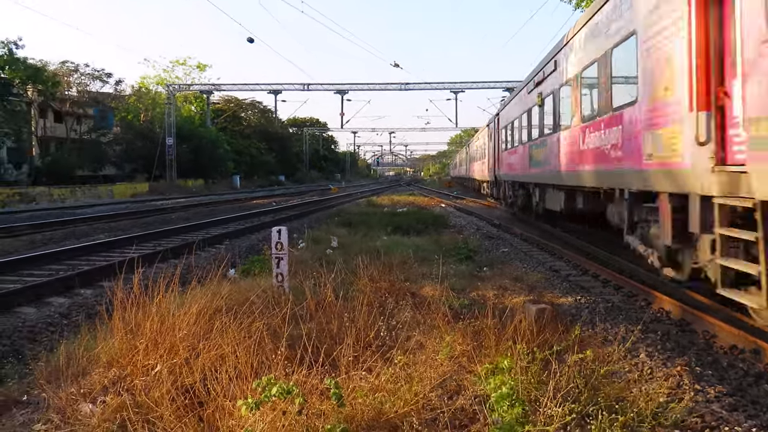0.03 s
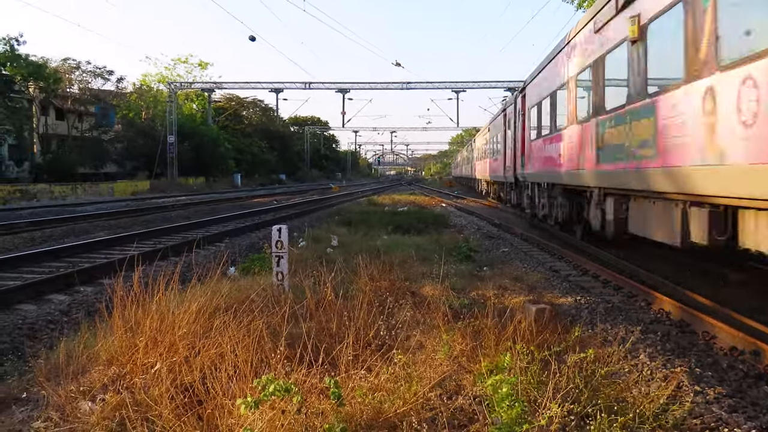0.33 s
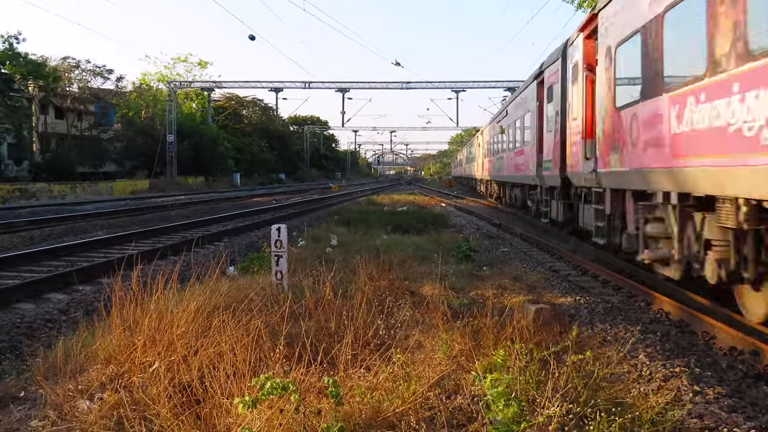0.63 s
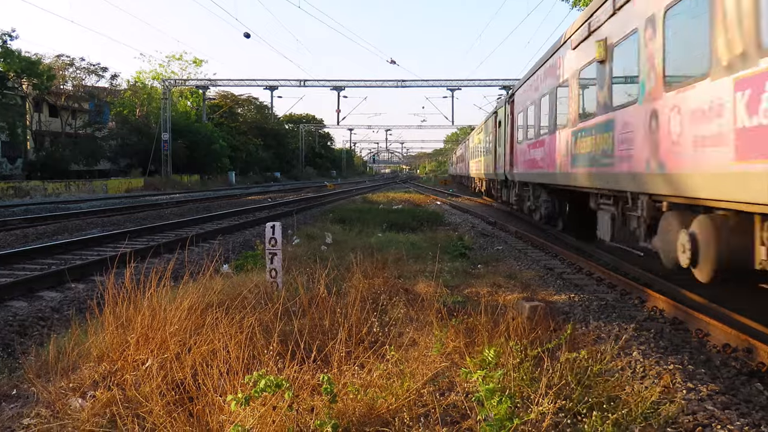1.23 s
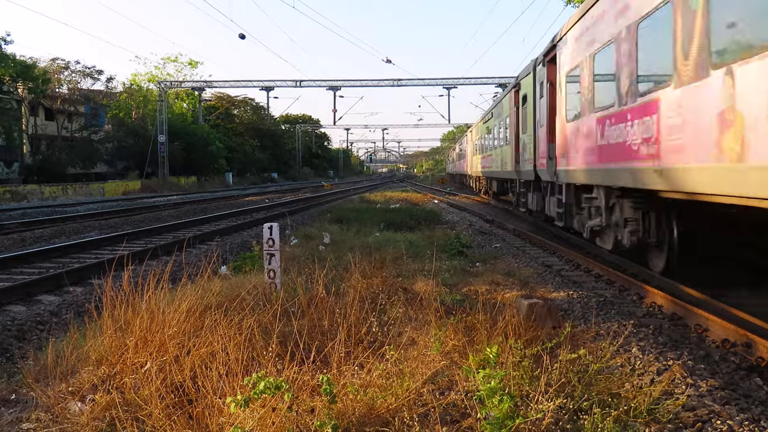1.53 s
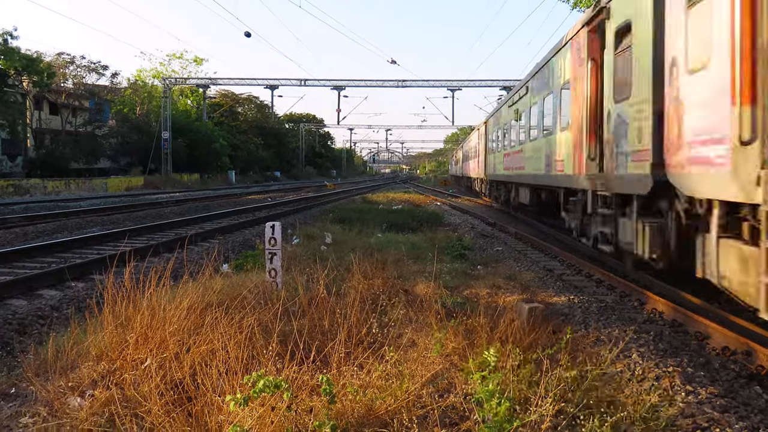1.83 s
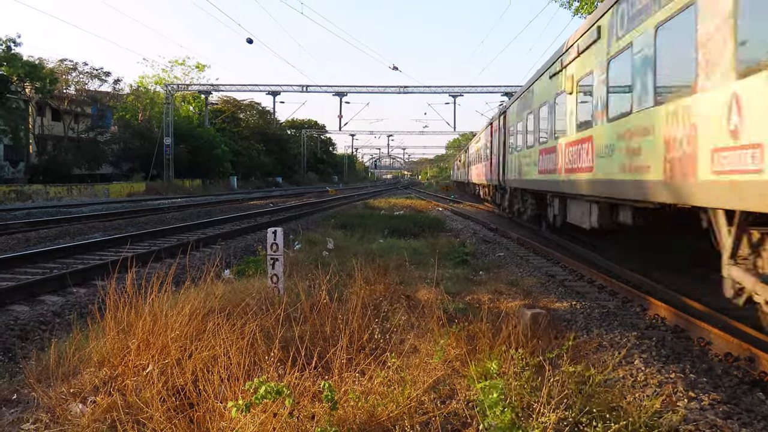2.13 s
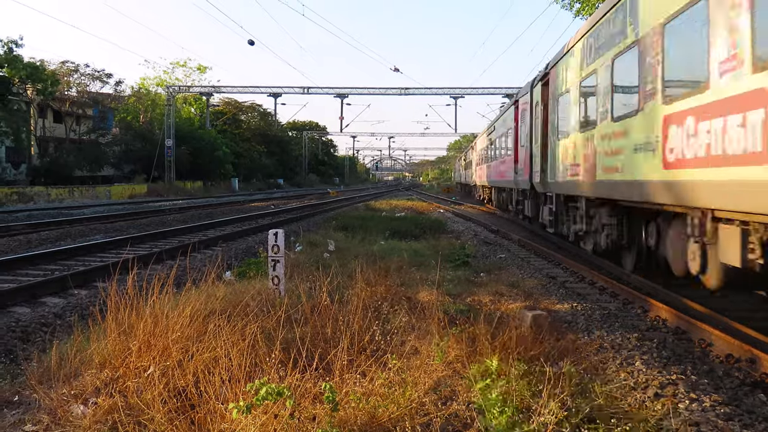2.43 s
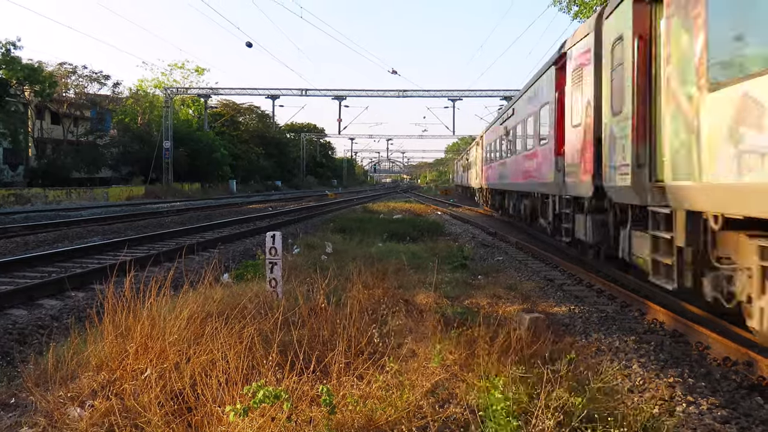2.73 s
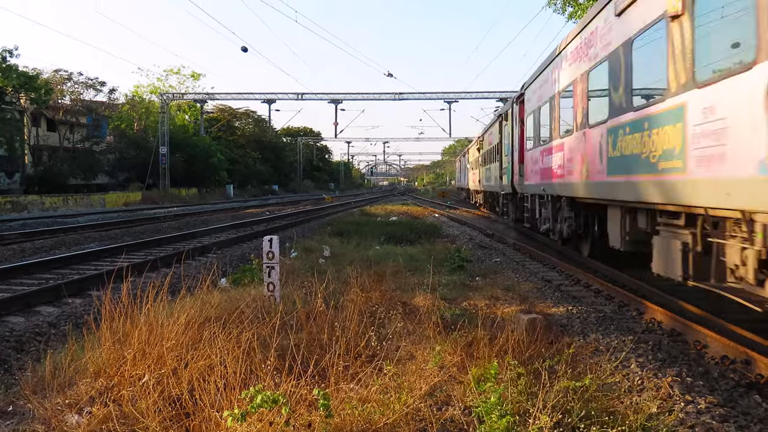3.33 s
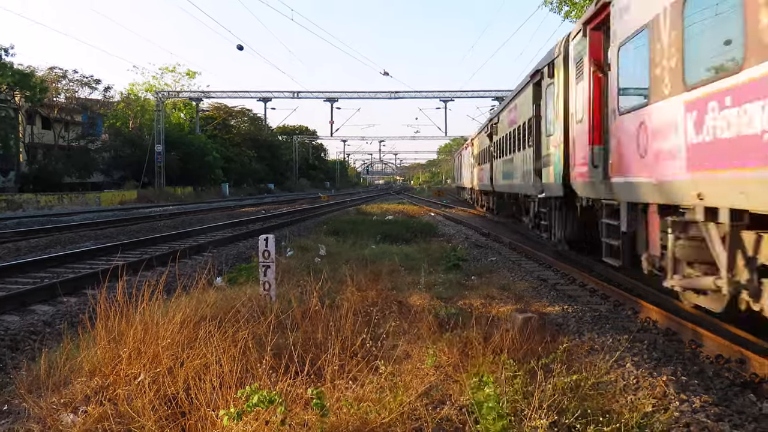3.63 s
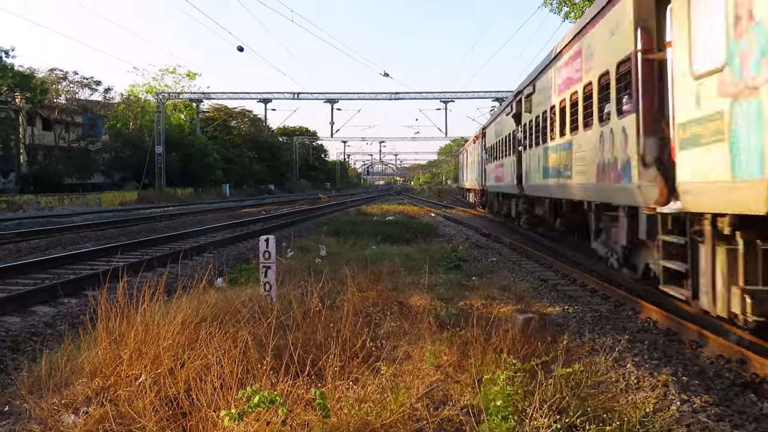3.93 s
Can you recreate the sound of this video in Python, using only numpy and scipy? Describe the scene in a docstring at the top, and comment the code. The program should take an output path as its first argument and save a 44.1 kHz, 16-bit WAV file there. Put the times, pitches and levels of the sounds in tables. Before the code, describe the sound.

A passenger train rolls past a few metres away on open ground, rumbling and roaring throughout. Light metal knocks crowd the first second. From 0.2 seconds, wheels clack in pairs over a rail joint about every half second, with distant knocks between. Near 1 second and from 2.9 seconds on, the steel wheels hiss and sing loudest, falling in pitch as their draught buffets the microphone.

```python
"""A passenger train rolls past a few metres from a stereo microphone on open ground.
Rumble and rolling roar run throughout; light knocks of the running gear crowd the first second.
From 0.2 s each bogie clacks twice over a rail joint, with distant wheels knocking in between.
Near 1 s, and again from 2.9 s on, steel wheels hiss and sing loudest, falling in pitch as they
go by, and their draught buffets the microphone."""
import sys
import numpy as np
from scipy import signal
from scipy.fft import rfft, irfft
from scipy.io import wavfile
from scipy.ndimage import map_coordinates

SR = 44100
rng = np.random.default_rng(int(sys.argv[2]) if len(sys.argv) > 2 else 0)


def waveform_to_disk(signal):
    """Save audio, clipped to [-1, 1], as 16-bit WAV at the path in sys.argv[1]."""
    frames = np.transpose(np.atleast_2d(signal))
    scaled = np.clip(frames, -1, 1) * 32767
    samples = np.round(scaled).astype(np.int16)
    wavfile.write(sys.argv[1], SR, samples)


N = 176400
T = np.arange(N) / SR
HZ = np.fft.rfftfreq(N, 1 / SR)
SLEEPER_HZ = 391  # usual knock pitch

# Hollow track boom, metal clank, bright steel crash. Each row: frequency in Hz, relative level in dB.
BOOM_SPECTRUM = [(200, -38.5), (330, 2.5), (395, 2.5), (480, -9)]
CLANK_SPECTRUM = [(200, -27.5), (550, 7), (800, 1), (1150, 0), (1400, -9.5), (2000, -4), (2500, -7),
                  (4000, -37)]
CRASH_SPECTRUM = [(600, 4.5), (2700, 3), (5300, 3.5), (6500, -9), (8000, -3.5), (12000, -26.5),
                  (15500, -29)]


def amp(db):
    """Decibels to gain."""
    return 10 ** (np.asarray(db) / 20)


def unit(x):
    """Scale to rms 1."""
    return x / np.sqrt(np.mean(x ** 2) + 1e-20)


def spectrum(points):
    """Gain per frequency from (Hz, dB) points, falling steeply above the last."""
    hz, db = np.transpose(points)
    return amp(np.interp(np.log(HZ + 1), np.log(hz + 1), db)) / np.maximum(HZ / hz[-1], 1) ** 4


def level(points):
    """Gain per sample from (s, dB) points."""
    return amp(np.interp(T, *np.transpose(points)))


def wander(rate_hz):
    """Low-passed random drift, rms 1."""
    return unit(irfft(rfft(rng.standard_normal(N)) / (1 + (HZ / rate_hz) ** 4), N))


def noise(points, ring_db=0, spacing_hz=60):
    """Coloured mid and side noise, rms 1; ring_db sets the depth of close random resonances."""
    smoothing = np.exp(-(np.arange(len(HZ)) * spacing_hz / SR) ** 2)
    ripple = unit(irfft(rfft(rng.standard_normal(N)) * smoothing, N))[:len(HZ)]
    resonances = amp(ring_db * np.clip(ripple, -2, 2))
    return unit(irfft(rfft(rng.standard_normal((2, N))) * spectrum(points) * resonances, N))


def blows(times_s, levels_db, fade_s, tail_db=-np.inf, tail_s=1, rise_s=0.0037):
    """Envelope of blows summed in power: quick rise, fast fade, optional tail."""
    power = np.zeros(N)
    for at_s, db in zip(times_s, levels_db):
        start = max(int((at_s - rise_s / 2) * SR), 0)
        t = T[:N - start][:SR]
        shape = np.minimum(t / rise_s, 1) * (np.exp(-t / fade_s) + amp(tail_db) * np.exp(-t / tail_s))
        power[start:start + len(t)] += (amp(db) * shape) ** 2
    return np.sqrt(power)


def sleeper(times_s, levels_db, pitches_hz):
    """Each blow rings the hollow modes of sleeper and rail, slightly detuned every time."""
    # Each row: multiple of the knock pitch, relative level in dB, t60 in seconds.
    modes = [(0.762, -8, 0.085), (1, 1, 0.071), (1.25, -7.5, 0.091), (1.95, -9.5, 0.065)]
    out, t = np.zeros(N + SR), T[:SR // 4]
    pitches_hz = pitches_hz * np.ones(len(times_s))
    detunes = 1 + 0.021 * rng.standard_normal((len(times_s), len(modes)))
    for at_s, db, hz, detune in zip(times_s, levels_db, pitches_hz, detunes):
        start = max(int(at_s * SR), 0)
        for k, (ratio, mode_db, t60_s) in enumerate(modes):
            tone = (-1) ** k * np.sin(2 * np.pi * hz * ratio * detune[k] * t)
            out[start:start + len(t)] += tone * amp(db + mode_db - 60 * t / t60_s)
    return np.array([out[:N], np.roll(out[:N], SR // 200)])  # side lags mid by 5 ms


def doppler(source, nearest_s, speed_m_per_s=24, distance_m=4.3):
    """Changing travel time bends the pitch of a passing source."""
    emitted_s = T - np.hypot(distance_m, speed_m_per_s * (T - nearest_s)) / 343
    near = abs(T - nearest_s) < .5
    positions = emitted_s[near] * SR % (N - 1)
    out = np.zeros((2, N))
    for channel in range(2):
        out[channel, near] = map_coordinates(source[channel], [positions], order=3, mode="wrap")
    return out


def rolling():
    """Rumble of the coaches, roar of rough wheels, throbbing boom of the track."""
    # Each row: frequency in Hz, relative level in dB.
    rumble_spectrum = [(15, -41), (48, -5.5), (105, -3.5), (200, -10.5), (1000, -50.5)]
    roar_spectrum = [(70, -32), (145, -11.5), (220, -8.5), (390, -3), (600, -11.5), (850, -12), (1350, -20),
                     (1800, -17.5), (2200, -25), (5000, -24), (6500, -38.5), (9500, -40.5), (16000, -54.5)]
    # Each row: time in seconds, relative level in dB.
    rumble_levels = [(0, -27), (.6, -32), (1.2, -38), (1.75, -39), (2.5, -35), (2.7, -36.5), (3.4, -31.5),
                     (4, -31.5)]
    roar_levels = [(0, -19), (.68, -20.5), (.79, -24), (.9, -22), (1.12, -23), (1.4, -26.5), (1.75, -27.5),
                   (2.0, -25.5), (2.15, -27), (4, -25.5)]
    rumble = noise(rumble_spectrum) * level(rumble_levels) * amp(wander(38))
    roar = noise(roar_spectrum, ring_db=1.5, spacing_hz=70)
    roar *= amp(-3.5 + 0.73 * wander(21) + 0.8 * wander(190))
    boom = noise(BOOM_SPECTRUM) * amp(-9 + 4.9 * wander(5.7))
    return rumble + (roar + boom) * level(roar_levels)


def far_knocks():
    """Of distant wheels only the hollow note of the track carries."""
    # Each row: start in seconds, relative level in dB.
    hits = [(0.115, -18), (0.703, -16.5), (1.117, -21.5), (1.534, -27), (1.65, -27.5), (2.481, -22.5),
            (2.615, -23.5), (3.464, -23.5)]
    at_s, db = np.transpose(hits)
    return sleeper(at_s, db + 7, SLEEPER_HZ) + noise(BOOM_SPECTRUM) * blows(at_s, db - 10, fade_s=0.03)


def draughts(width_s=0.034):
    """Gusts from the bogies push the two microphone ports in opposite phase."""
    # Each row: peak time in seconds, level in dB.
    gusts = [(0.97, -30), (2.92, -35), (3.27, -26.5), (3.88, -25.5)]
    # Each row: frequency in Hz, relative level in dB.
    gust_spectrum = [(30, -22.5), (120, -3.5), (420, 0), (1200, -15)]
    swell = sum(amp(db) / (1 + ((T - peak_s) / width_s) ** 2) ** 0.85 for peak_s, db in gusts)
    return noise(gust_spectrum)[0] * swell * np.array([[1], [-1]])


def gear_knocks():
    """Single short blows of the running gear, each with a dull thud of the underframe."""
    # Each row: start in seconds, then relative clank, knock and crash levels in dB.
    hits = [(0.046, -24, -19, -23), (0.074, -9.5, -14.5, -22), (0.373, -20, -17, -18.5),
            (0.482, -15, -11.5, -20), (0.544, -9.5, -16.5, -28), (0.597, -11, -18, -16.5),
            (0.837, -8.5, -16.5, -18), (1.045, -4.5, -21, -32), (1.073, -9.5, -13.5, -50),
            (1.17, -13, -16.5, -34), (2.058, -14, -22, -31.5)]
    # Each row: frequency in Hz, relative level in dB.
    thud_spectrum = [(80, -15), (150, 0.5), (320, 12.5), (600, -21.5)]
    at_s, clank_db, knock_db, crash_db = np.transpose(hits)
    thud = noise(thud_spectrum) * blows(at_s, knock_db - 9.5, fade_s=0.032)
    clank = noise(CLANK_SPECTRUM) * blows(at_s, clank_db - 14, fade_s=0.032, tail_db=-16.5, tail_s=0.037)
    crash = noise(CRASH_SPECTRUM, ring_db=-2.5, spacing_hz=50)
    crash *= blows(at_s, crash_db - 2.5, fade_s=0.031)
    return thud + sleeper(at_s, knock_db, SLEEPER_HZ) + (clank + crash) * amp(1.56 * wander(250))


def wheels():
    """Steel wheels hiss while their bogie is abreast; their lower modes ring on as it leaves."""
    # Each row: time when nearest and time spent abreast in seconds, hiss and ring levels in dB.
    bogies = [(-0.05, 0.093, -34, -29), (0.934, 0.1, -28, -28.5), (1.883, 0.087, -35, -31.5),
              (2.261, .14, -36, -31.5), (2.885, 0.14, -27, -28.5), (3.276, 0.11, -27.5, -27),
              (3.882, 0.14, -28, -27)]
    # Each row: frequency in Hz, relative level in dB.
    hiss_spectrum = [(1500, -29), (3500, -17), (5000, -7), (6800, 1.5), (10500, -6), (11600, 10.5),
                     (13600, 9.5), (14500, -6), (16000, 12)]
    ring_spectrum = [(1500, -7), (2400, -1.5), (4500, 4.5), (5600, 1.5), (6800, -18), (15000, -8)]
    hiss_rise_db_per_s, hiss_fall_db_per_s = 596, 162
    ring_rise_db_per_s, ring_fall_db_per_s = 455, 78
    out = np.zeros((2, N))
    for nearest_s, abreast_s, hiss_db, ring_db in bogies:
        before_s = np.maximum(nearest_s - abreast_s / 2 - T, 0)
        after_s = np.maximum(T - nearest_s - abreast_s / 2, 0)
        hiss = doppler(noise(hiss_spectrum, ring_db=6, spacing_hz=170), nearest_s)
        ring = doppler(noise(ring_spectrum, ring_db=6.5, spacing_hz=100), nearest_s)
        out += hiss * amp(hiss_db - hiss_rise_db_per_s * before_s - hiss_fall_db_per_s * after_s)
        out += ring * amp(ring_db - ring_rise_db_per_s * before_s - ring_fall_db_per_s * after_s)
    return out


def squeals(slide_share=.026, flutter_share=.0085):
    """Single wheel modes swell, flutter and slide down in passing; longer ones slide more slowly."""
    # Each row: peak time in seconds, centre pitch in Hz, level in dB, swell time in seconds.
    tones = [(0.899, 5730, -30, .025), (0.974, 5880, -28.5, .018), (0.975, 5080, -29, .022),
             (0.985, 4330, -28, .02), (0.99, 12450, -31, .018), (1.192, 1720, -39.5, .06),
             (1.45, 4170, -40, .05), (1.45, 1850, -40.5, .1), (1.49, 3490, -39, .04),
             (1.53, 2330, -42.5, .12), (2.43, 4350, -43, .04), (2.53, 1810, -40, .1),
             (2.91, 13900, -26, .02), (2.93, 12050, -28, .02), (3.28, 11430, -30, .025),
             (3.308, 4460, -22, .022), (3.34, 5190, -43, .04), (3.519, 1720, -36, .028),
             (3.85, 2790, -31, .035), (3.88, 13650, -28, .028), (3.899, 4570, -33, .05),
             (3.919, 11500, -26, .025), (3.96, 5200, -50, .022)]
    out = np.zeros((2, N))
    flutter, shimmer = wander(130), wander(70)
    for (peak_s, hz, db, swell_s), shift in zip(tones, rng.integers(0, N, len(tones))):
        age = (T - peak_s) / swell_s
        near = abs(age) < 10
        slide = slide_share * np.tanh(age[near] / 2)
        pitch_hz = hz * (1 - slide + flutter_share * np.roll(flutter, shift)[near])
        phase = 2 * np.pi * np.cumsum(pitch_hz) / SR
        swell = amp(db + 2.5 * np.roll(shimmer, shift)[near]) / np.cosh(age[near])
        out[:, near] += swell * np.array([np.sin(phase), np.cos(phase)])
    return out


def clacks(landing_s=0.022, spread_s=0.00624, trailing_db=-5):
    """Each axle strikes the joint, then lands on the far rail end: thump, knock, clank, steel crash."""
    # Each row: start in seconds, relative clank, knock and crash levels in dB, knock pitch in Hz.
    axles = [(0.232, -15.5, -22, -24, 423), (0.337, -14.5, -16.5, -22, 336), (0.819, -17, -20, -28, 406),
             (0.942, -36, -17.5, -25, 444), (1.213, -19.5, -22, -25.5, 455), (1.315, -21.5, -15, -22, 436),
             (1.822, -15, -14, -22, 425), (1.926, -14, -15.5, -24.5, 434), (2.194, -17, -15.5, -21.5, 447),
             (2.297, -15, -13.5, -22.5, 389), (2.805, -15, -11.5, -19, 387),
             (2.908, -14.5, -13, -22.5, 389), (3.176, -16, -12.5, -19.5, 320),
             (3.283, -15, -15, -20.5, 393), (3.786, -16.5, -10.5, -16.5, 369),
             (3.889, -15, -14.5, -23, 400)]
    # Ground thump and sleeper knock. Each row: frequency in Hz, relative level in dB.
    thump_spectrum = [(20, -23.5), (50, -8.5), (105, -3.5), (180, -7.5), (260, -7), (800, -63)]
    knock_spectrum = [(100, -44.5), (220, -14.5), (410, 3), (510, -3), (600, -21), (900, -45)]
    strike_s, clank_db, knock_db, crash_db, pitch_hz = np.transpose(axles)
    hits_s = np.r_[strike_s, strike_s + landing_s + spread_s * rng.uniform(-1, 1, len(axles))]
    softer_db = trailing_db * (np.arange(len(axles)) % 2)  # a bogie's second axle lands more softly

    def hits_db(db, strike_db, landing_db):
        return np.r_[db + strike_db, db + landing_db + softer_db]

    thump = noise(thump_spectrum)
    thump *= blows(strike_s, knock_db - 11, fade_s=0.067, tail_db=-14.5, tail_s=0.15)
    knock = noise(knock_spectrum) * blows(hits_s, hits_db(knock_db, -6, -3), fade_s=0.038)
    ring = sleeper(hits_s, hits_db(knock_db, 0, -3), np.tile(pitch_hz, 2))
    clank = noise(CLANK_SPECTRUM, ring_db=2, spacing_hz=60)
    clank *= blows(hits_s, hits_db(clank_db, -9, -10), fade_s=0.029, tail_db=-8, tail_s=0.11)
    crash = noise(CRASH_SPECTRUM, ring_db=2, spacing_hz=70)
    crash *= blows(hits_s, hits_db(crash_db, -2, -3.5), fade_s=0.021, tail_db=-7, tail_s=0.11)
    return thump + knock + ring + (clank + crash) * amp(1.62 * wander(180))


def scene():
    """The train in mid and side, spread to left and right by the microphone pair, plus draughts."""
    # Stereo width. Each row: frequency in Hz, side gain over mid in dB.
    side_over_mid = [(70, -39.5), (160, -28), (800, -19), (2400, -7.5), (4400, -15), (6100, -12.5),
                     (8500, 31), (10300, 26), (11500, 6), (13000, 2), (15000, 25)]
    train = rolling() + clacks() + gear_knocks() + far_knocks() + wheels() + squeals()
    width = spectrum(side_over_mid)
    gains = np.array([np.ones(len(HZ)), width]) / np.hypot(1, width)
    mid, side = irfft(rfft(train) * gains, N)
    return np.array([mid + side, mid - side]) + draughts()


def record(dry, ceiling=.8, cutoff_hz=15700):
    """A soft limiter rounds off the loudest clack peaks; a low-pass limits the band."""
    rounded = dry / (1 + (dry / ceiling) ** 4) ** (1 / 4)
    lowpass = signal.firwin(511, cutoff_hz, window=("kaiser", 9), fs=SR)
    return signal.oaconvolve(rounded, lowpass[None], "same")


dry = scene()
out = record(dry)
waveform_to_disk(out)
```